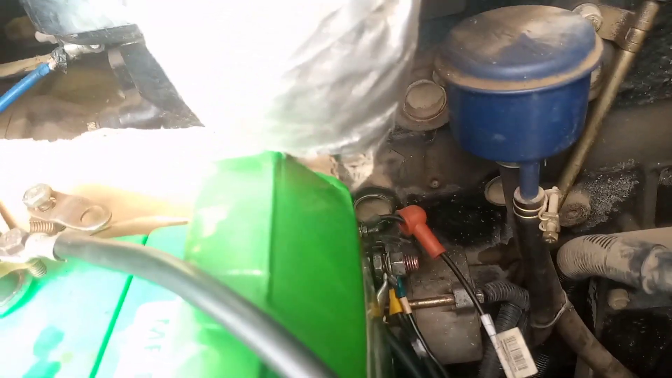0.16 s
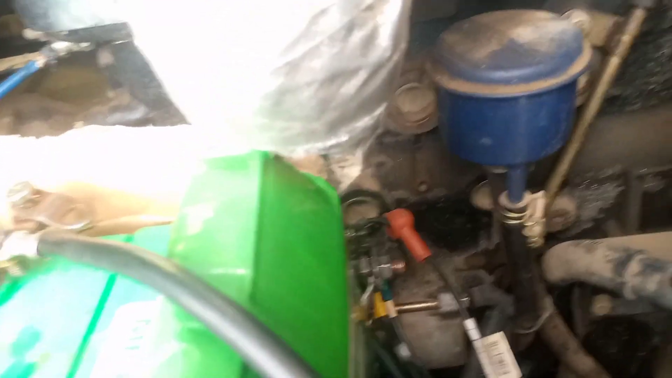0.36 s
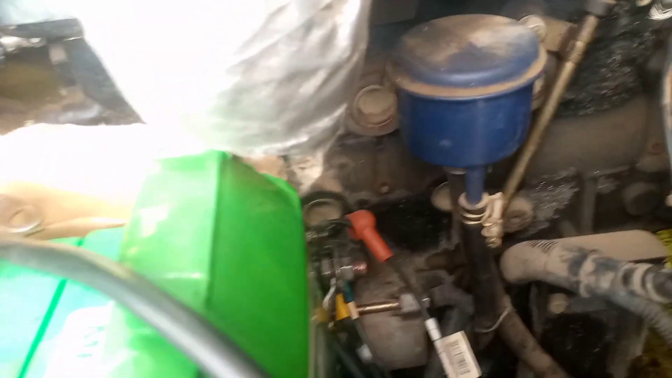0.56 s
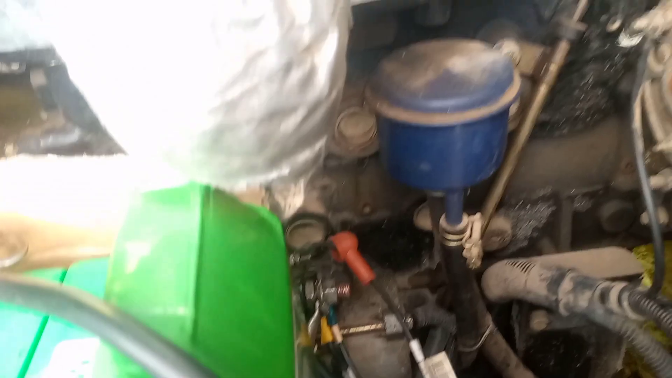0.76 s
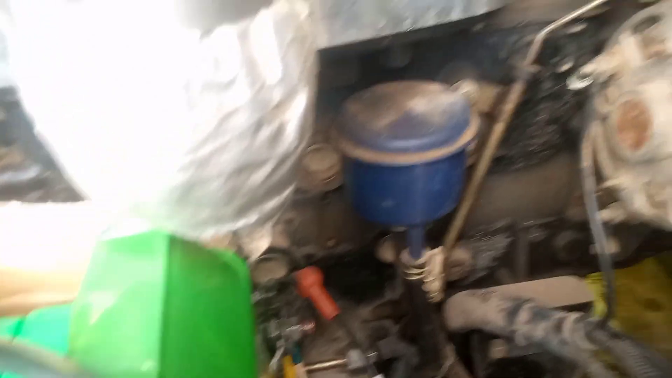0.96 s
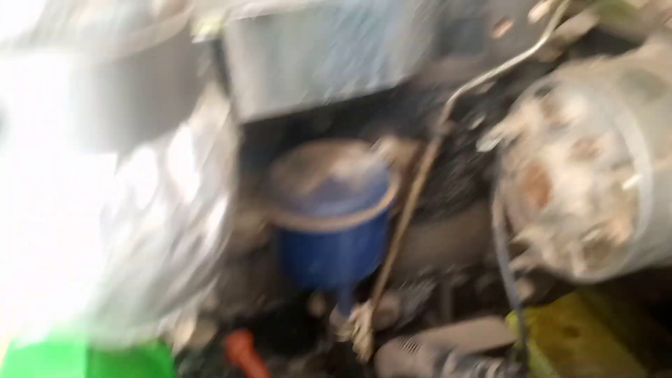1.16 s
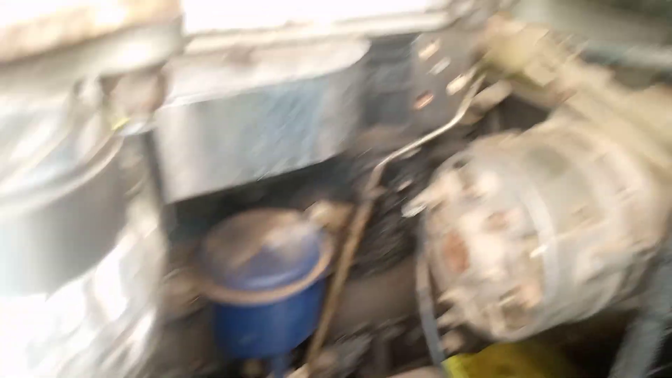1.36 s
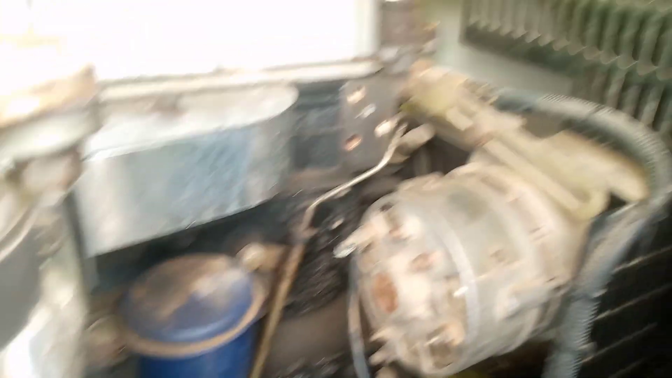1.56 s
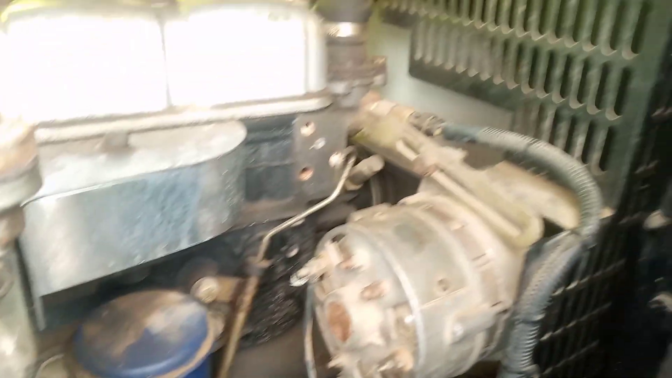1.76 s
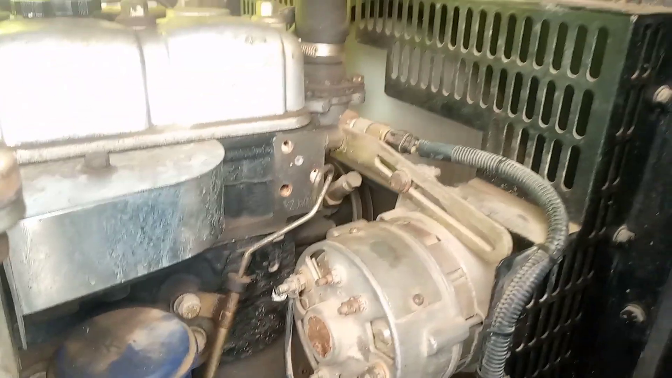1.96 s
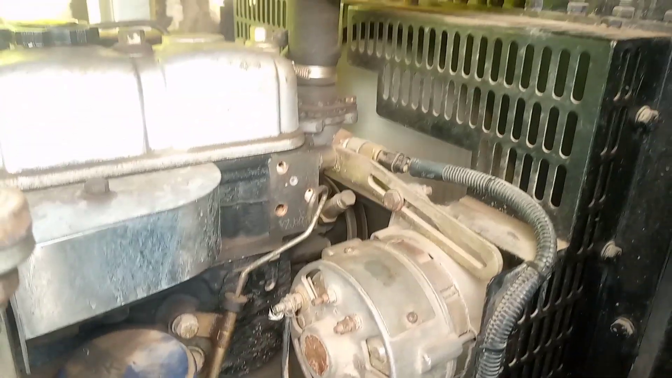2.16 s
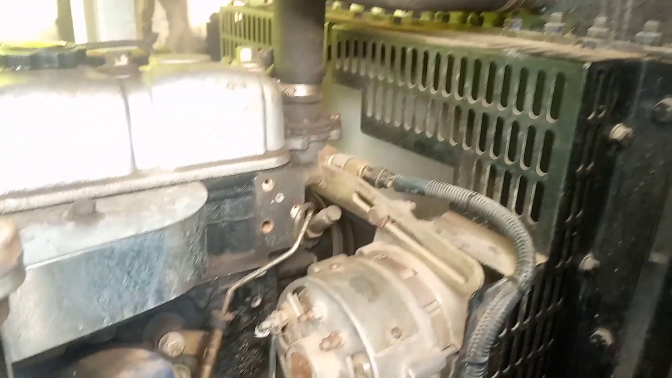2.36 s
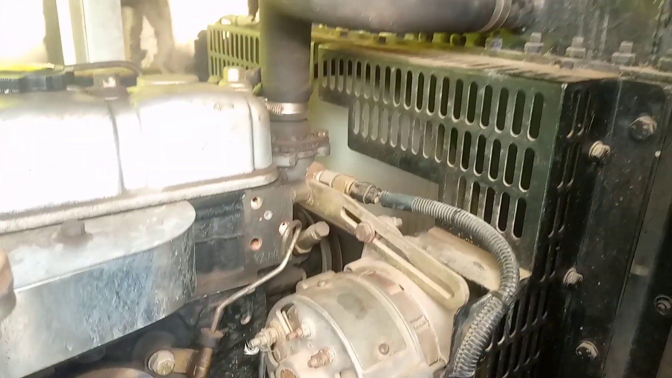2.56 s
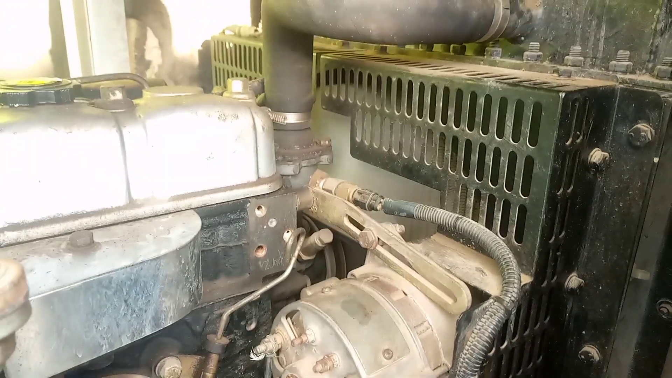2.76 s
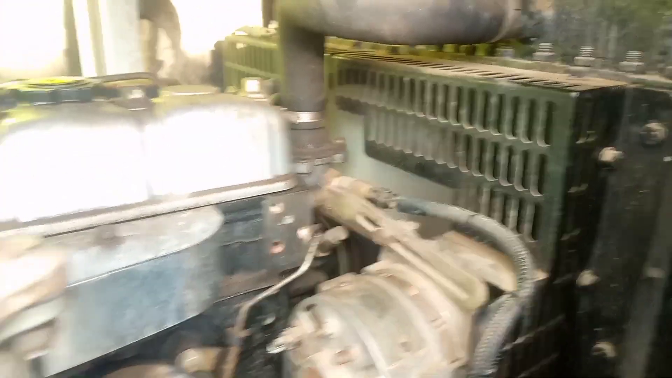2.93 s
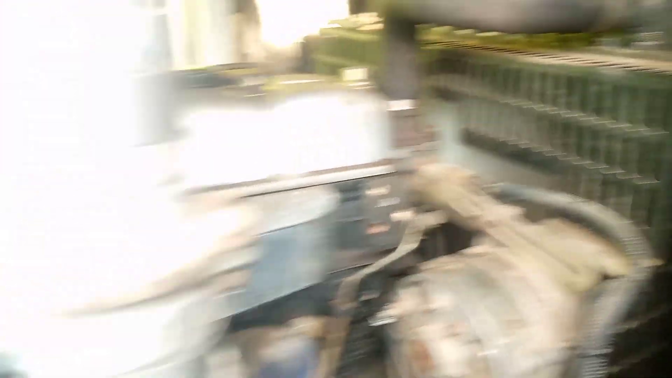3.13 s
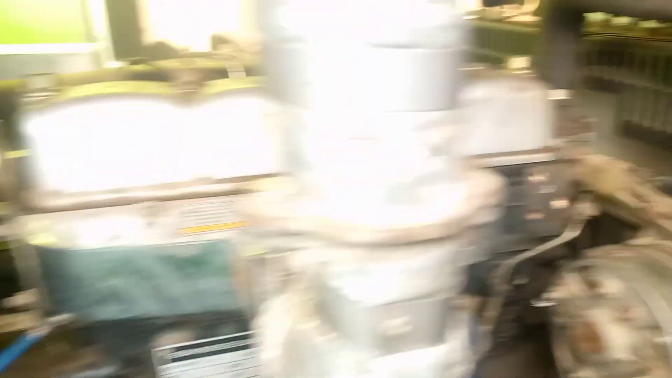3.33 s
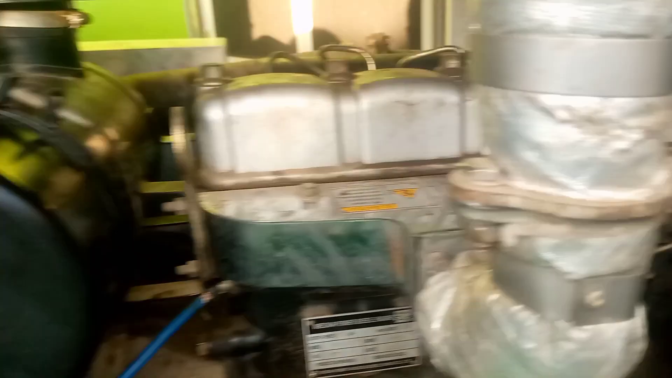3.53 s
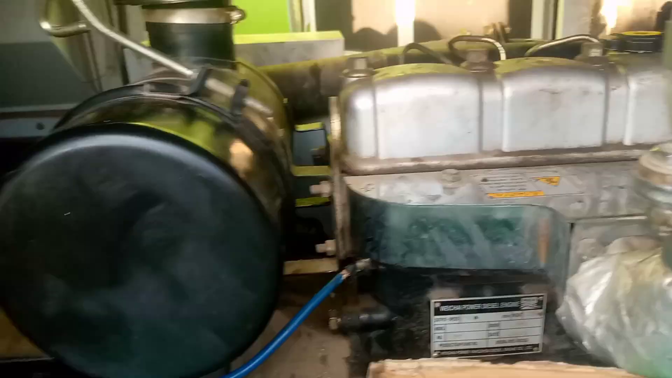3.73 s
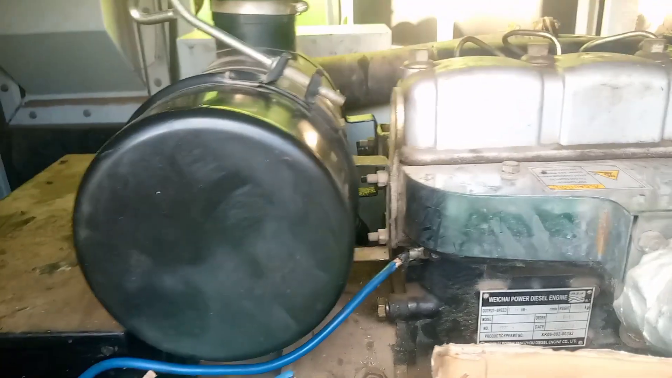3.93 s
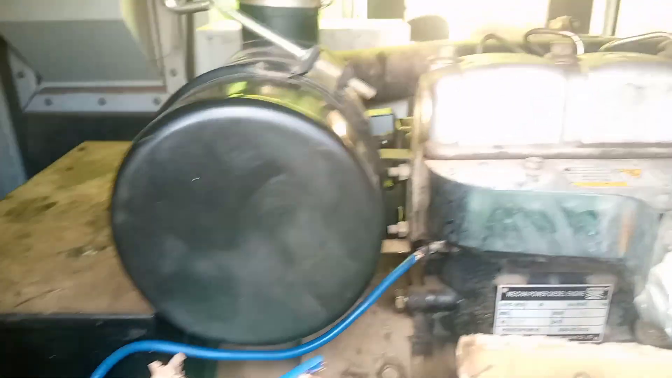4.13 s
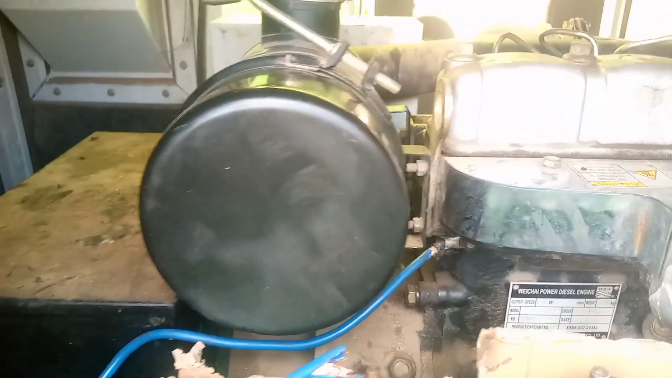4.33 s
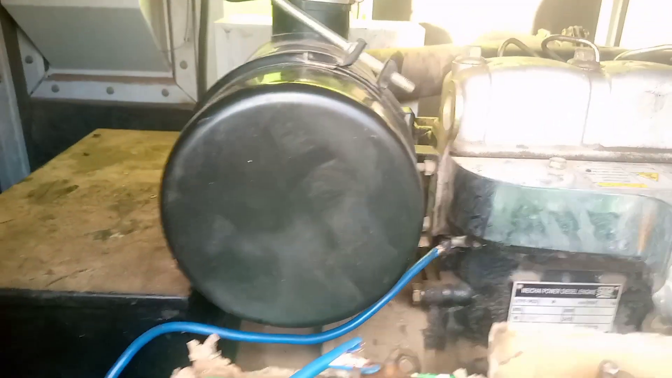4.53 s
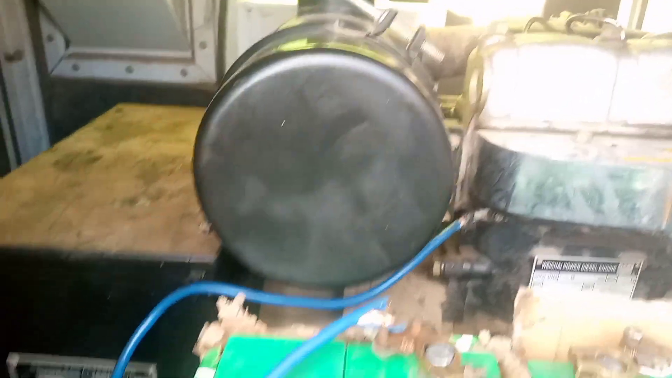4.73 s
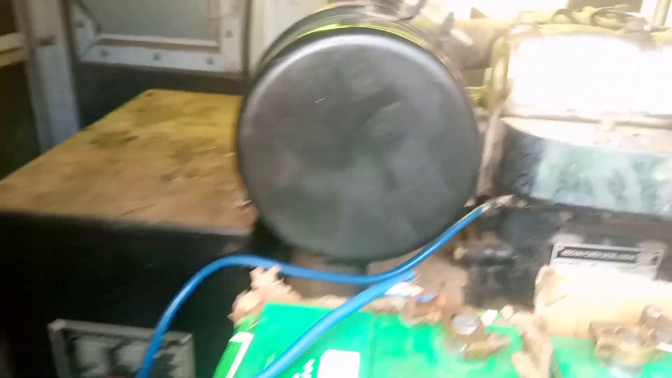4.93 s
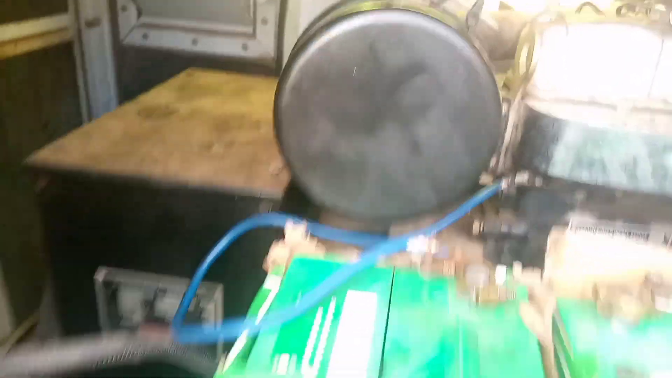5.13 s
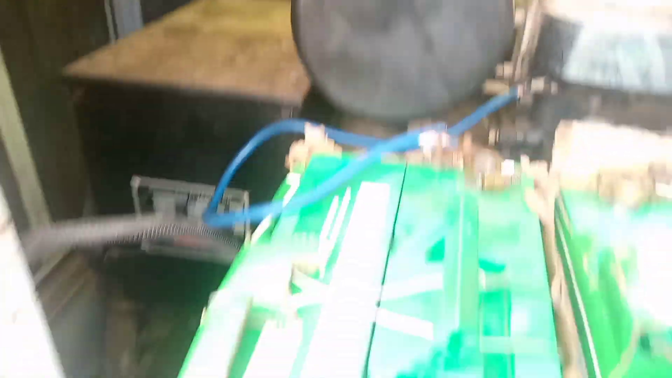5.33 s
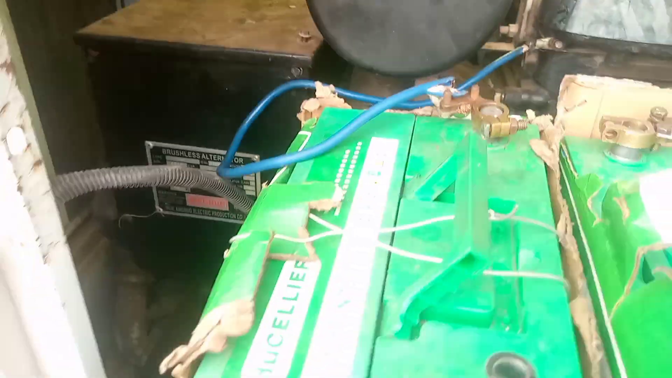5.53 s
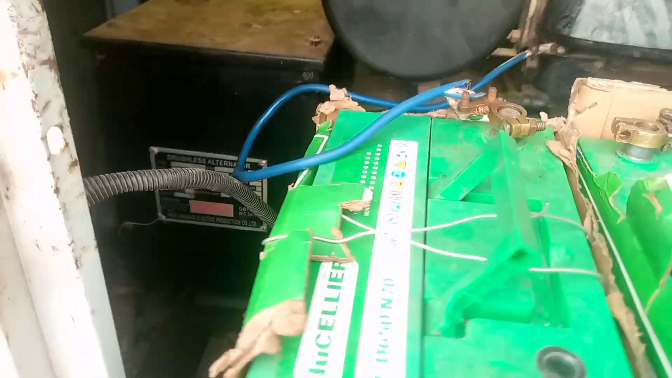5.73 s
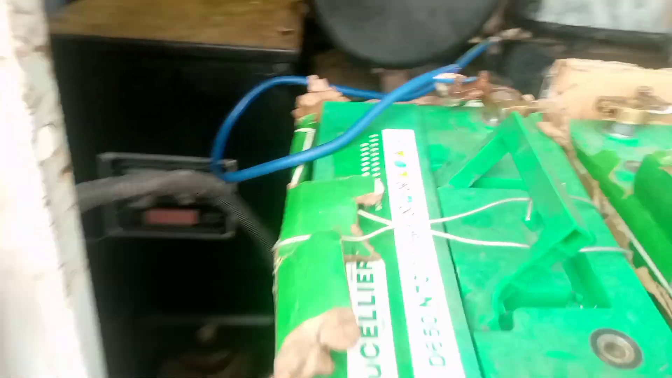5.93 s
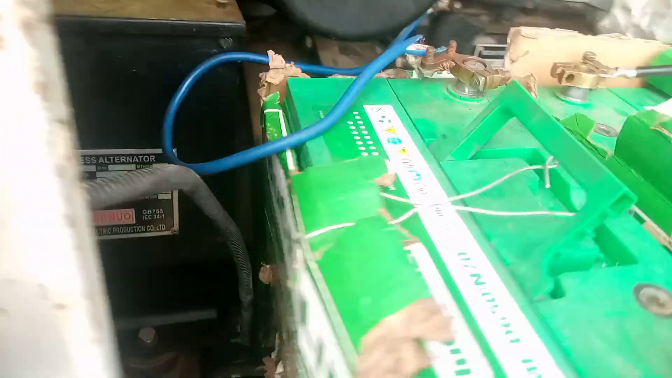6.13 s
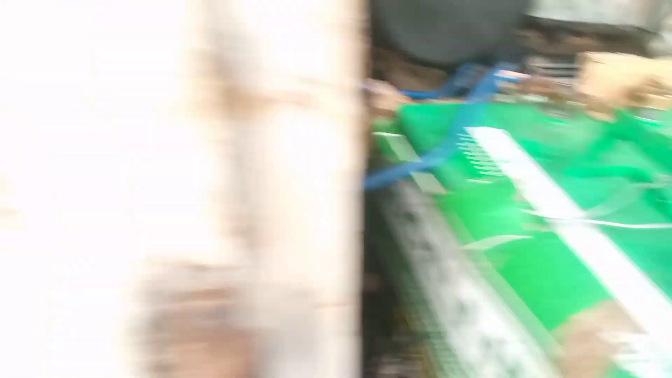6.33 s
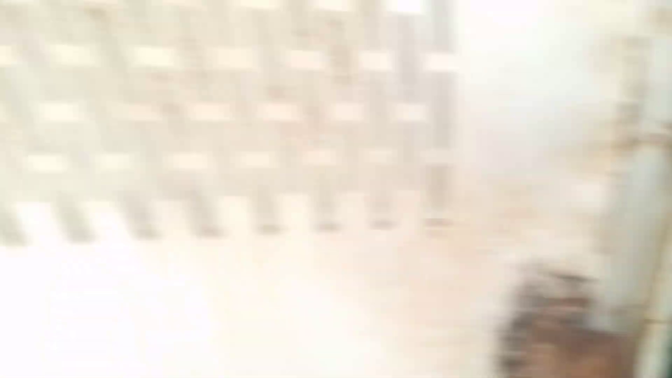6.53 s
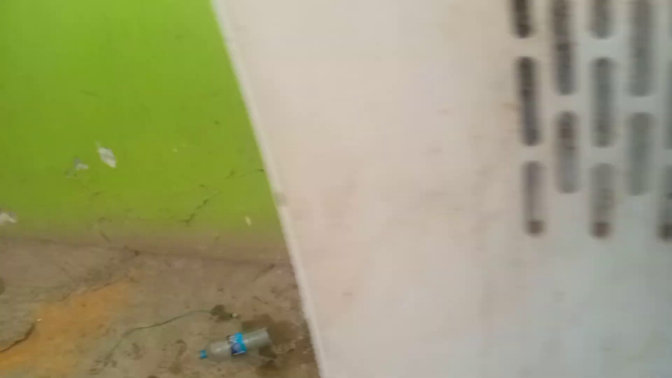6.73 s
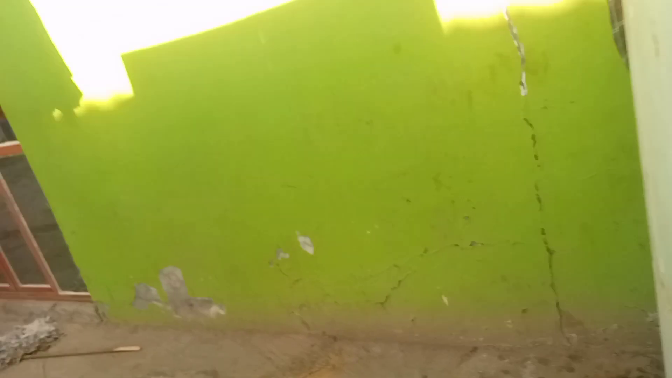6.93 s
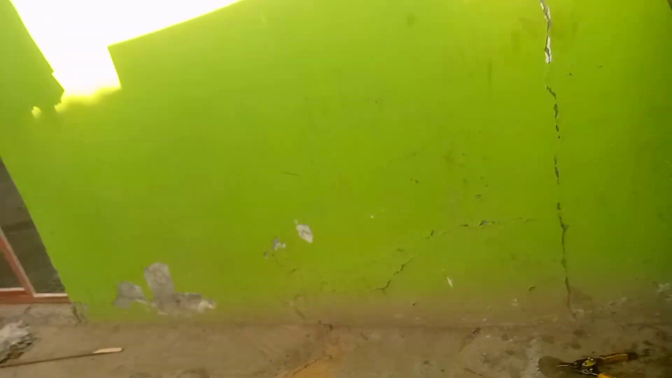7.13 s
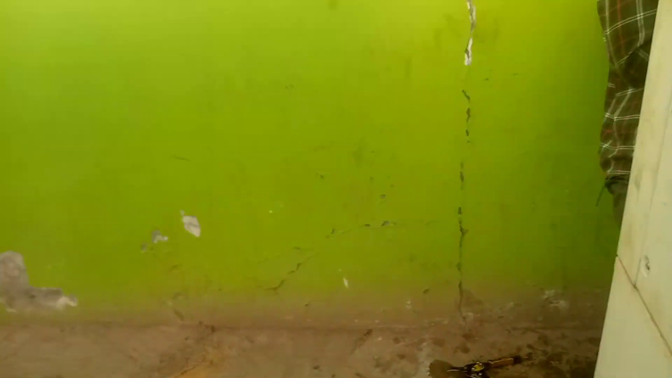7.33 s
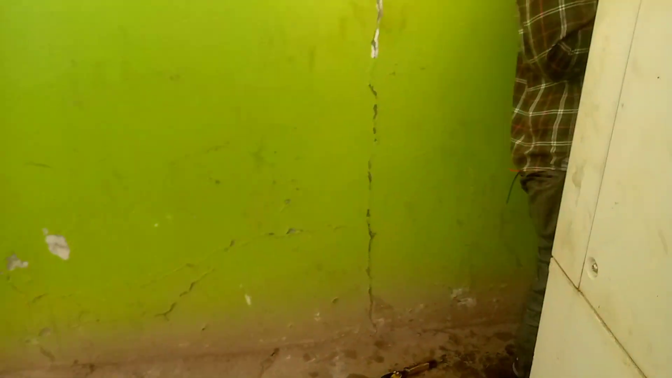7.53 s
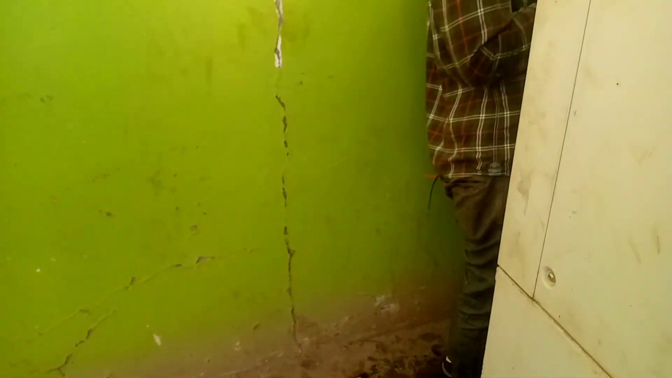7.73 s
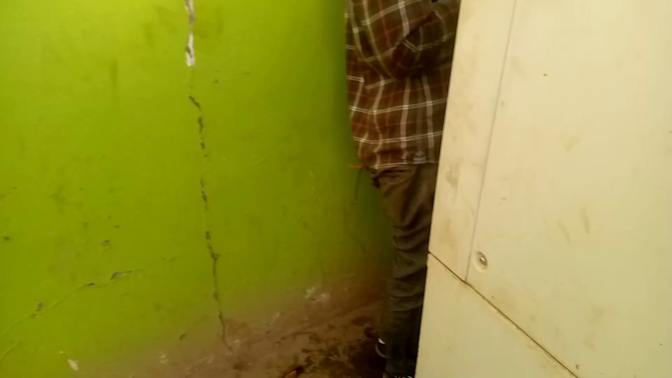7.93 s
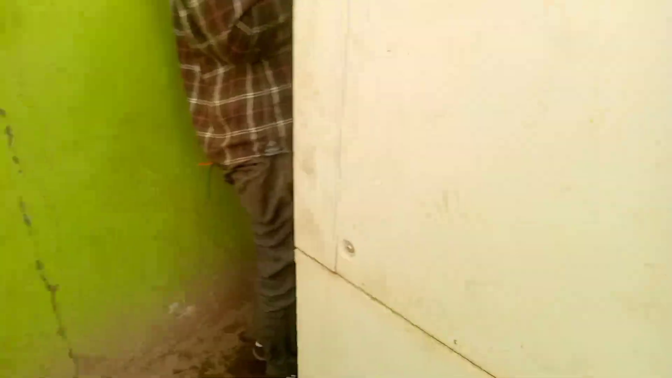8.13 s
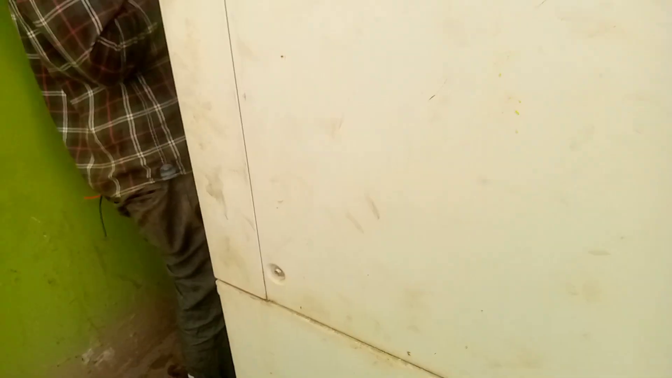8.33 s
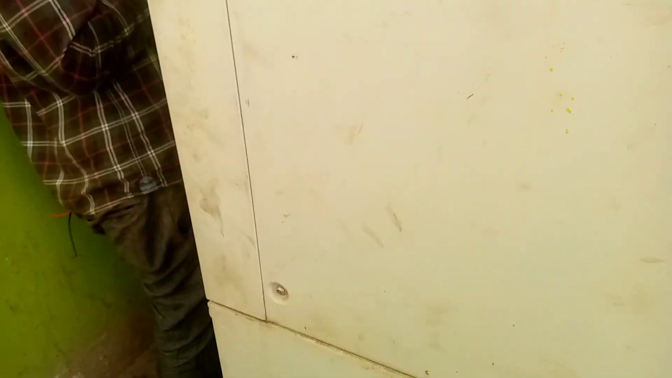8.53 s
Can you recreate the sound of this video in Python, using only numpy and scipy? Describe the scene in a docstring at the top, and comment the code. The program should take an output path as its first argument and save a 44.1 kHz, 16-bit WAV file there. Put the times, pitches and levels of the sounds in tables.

```python
"""Outdoors, close beside a four-cylinder diesel generator running at governed speed in a steel canopy.
Every firing gives an exhaust boom and a knock that rings the block; gears, valves and fan fill the gaps.
The microphone, on a hand-held camera, passes the alternator and the air cleaner, then backs away
behind the canopy, where the clatter turns dull. Fingers click on the camera body,
and the loudest click makes its limiter duck."""
import sys
import numpy as np
from scipy import signal
from scipy.fft import rfft, irfft, next_fast_len
from scipy.io import wavfile
from scipy.ndimage import uniform_filter1d, minimum_filter1d, map_coordinates

SR = 44100
rng = np.random.default_rng(int(sys.argv[2]) if len(sys.argv) > 2 else 0)


def master_out(mix):
    """Clip the mix to full scale and print it as 16-bit PCM to the path in sys.argv[1]."""
    frames = np.transpose(np.atleast_2d(mix))
    ceiling = np.clip(frames, -1, 1)
    pcm = np.round(ceiling * 32767).astype(np.int16)
    wavfile.write(sys.argv[1], SR, pcm)


N = 378378

# the cylinders in firing order: (relative knock [dB], relative injector tick [dB], lateness [s])
CYLINDERS = [(2, -9, 0.00017), (1.5, -6, 0.000056), (0.8, -10, 0), (2.47, -1, 0.0011)]
# load drags the firing rate down, the governor pulls it back: (time [s], half length [s], depth [Hz])
SPEED_SAGS = [(2.0, .45, .28), (7.6, .8, .09)]


def amp(db):
    """Decibels to gain."""
    return 10 ** (np.asarray(db) / 20)


def unit(x):
    """Scale to rms 1."""
    return x / np.sqrt(np.mean(x ** 2) + 1e-20)


def along(points, hz):
    """Read a curve of (frequency [Hz], value) points on a log axis."""
    freqs, values = np.transpose(points)
    return np.interp(np.log(hz + 1), np.log(freqs + 1), values)


def above(hz, edge_hz, order=8):
    """Gain of a high-pass."""
    return 1 / np.sqrt(1 + (edge_hz / (hz + 1)) ** (2 * order))


def wobble(rate):
    """A smooth random curve, rate knots a second."""
    return map_coordinates(rng.standard_normal(int(N * rate / SR) + 4), [np.arange(N) * rate / SR])


def swells(rows):
    """Sum of even rises and falls, one for each row of (time [s], half length [s], height)."""
    t = np.arange(N) / SR
    return sum(height * np.clip(1 - abs(t - centre) / half, 0, 1) for centre, half, height in rows)


def filtered(x, gain):
    """Apply a gain that depends on frequency."""
    size = next_fast_len(N + SR // 2)
    return irfft(rfft(x, size) * gain(np.fft.rfftfreq(size, 1 / SR)), size)[:N]


def resonate(x, gain, size=8192):
    """Apply a gain curve as a causal filter, so that its peaks ring after each blow."""
    cepstrum = irfft(np.log(gain(np.fft.rfftfreq(size, 1 / SR)) + 1e-6))
    cepstrum[1:size // 2] *= 2
    cepstrum[size // 2 + 1:] = 0
    return signal.oaconvolve(x, irfft(np.exp(rfft(cepstrum))))[:N]


def strike(times, bursts):
    """Lay one burst (row) at each time."""
    at = np.round(times * SR).astype(int)[:, None] + np.arange(bursts.shape[1])
    inside = (at >= 0) & (at < N)
    return np.bincount(at[inside], bursts[inside], N)


def firing_count(firing_hz=40.977, creep_hz_per_s=.0105):
    """Firings since the start: a governed rate that creeps down and sags now and then."""
    rate = firing_hz - creep_hz_per_s * np.arange(N) / SR - swells(SPEED_SAGS)
    return np.cumsum(rate) / SR - .028


def firing_times(firings, phase):
    """Number and time of every firing, taken at a phase (0-1) of its turn."""
    number = np.arange(int(firings[-1]) + 1)
    return number, np.interp(number + phase, firings, np.arange(N) / SR)


def microphone_walk():
    """Place number and levels at the microphone: held at each stop, gliding between stops."""
    # places 0-5 are oil filler, alternator, air cleaner, battery, door edge, behind the canopy:
    # (arrival [s], departure [s], boom [dB], clatter [dB], treble [dB], cover against clatter [dB])
    stops = [(0, .8, -22.8, -22.5, -32.5, -11), (1.25, 3.05, -24.6, -21.5, -37, -18.5),
             (3.75, 4.65, -23.5, -23.5, -38, -20), (5.15, 5.853, -24, -24.5, -37.5, -16.5),
             (6.3, 6.526, -24.5, -25, -38, -23), (7.24, 8.58, -32, -36.5, -56, -16.5)]
    stops = np.array(stops)
    times = np.sort(stops[:, :2].ravel())
    columns = [np.arange(len(stops)), *stops[:, 2:].T]
    return [np.interp(np.arange(N) / SR, times, np.repeat(column, 2)) for column in columns]


def handling():
    """Fingers click on the camera body, right at the microphone."""
    # finger clicks: (time [s], strength [dB])
    clicks = [(0.8674, 6.5), (2.9742, -12.5)]
    # modes of the camera body: (frequency [Hz], relative level [dB], t60 [s])
    case_modes = [(2110, -1, 0.0034), (4920, -1.5, 0.0021), (9500, -37, .002)]
    times, click_db = np.transpose(clicks)
    t = np.arange(SR // 50) / SR
    ring = sum(amp(db - 60 * t / t60) * np.sin(2 * np.pi * hz * t) for hz, db, t60 in case_modes)
    taps = strike(times, amp(click_db)[:, None] * ring)
    return filtered(taps, lambda hz: amp(along([(5500, 0.5), (8000, -13), (15000, -13.5)], hz)))


def panel_drone(firings):
    """The panels hum, a little unsteadily, on multiples of the whole engine cycle."""
    # panel tones: (multiple of the four-stroke cycle rate, relative level [dB])
    tones = [(6, -5.5), (10, -4), (17, -1), (20, -4), (24, -1), (25, 1), (27, -4), (36, -7.5), (64, -5.5)]
    cycles = firings / len(CYLINDERS)
    return sum(amp(db + 2.0 * wobble(6)) * np.sin(2 * np.pi * (k * cycles + rng.random()))
               for k, db in tones)


def cover_ring(firings, cover_hz=620, t60=0.047):
    """One cylinder's knock sets a nearby cover ringing, a hollow beat ten times a second."""
    number, times = firing_times(firings, phase=.62)
    times = times[number % len(CYLINDERS) == 1]
    t = np.arange(SR // 10) / SR
    strength_db, detune = rng.standard_normal((len(times), 2)).T[:, :, None]
    envelope = amp(strength_db - 60 * t / t60) * (1 - np.exp(-t / 0.0032))
    ring = envelope * np.sin(2 * np.pi * cover_hz * (1 + 0.028 * detune) * t)
    return unit(strike(times, ring))


def panel_echoes(x, echo_db=-18, delays_s=(.0023, .0037, .0059), sway_s=0.00033):
    """Nearby panels echo with delays that drift as the microphone moves, so the colour keeps shifting."""
    n = np.arange(N)
    echoes = sum(np.interp(n - SR * (delay + sway_s * wobble(0.786)), n, x) for delay in delays_s)
    return x + amp(echo_db) * echoes


def yard_wash(x, t60):
    """Reflections inside the canopy and off the yard wall smear the knocks into a wash."""
    t = np.arange(SR // 4) / SR
    energy = signal.oaconvolve(x ** 2, amp(-60 * t / t60) ** 2)[:N]
    return unit(np.sqrt(abs(energy)) * rng.standard_normal(N))


def exhaust(firings, place):
    """Every firing gives one low push and suction, over a soft rumble of gas flow."""
    # boom at the open door and behind the canopy: (multiple of the firing rate, relative level [dB])
    door_orders = [(1, -14), (2, -1), (3, -6.5), (4, -16.5), (5, -25.5)]
    behind_orders = [(1, -7), (2, -2), (3, -8.5), (4, -21), (5, -19.5)]
    # gas flow in the exhaust: (frequency [Hz], relative spectral level [dB])
    flow_spectrum = [(20, -20), (45, -9), (62, -1.5), (110, -0.5), (180, -2), (300, -28.5), (900, -88)]
    angle = 2 * np.pi * (firings - .125)
    pulse = lambda orders: unit(-sum(amp(db) * np.sin(k * angle) for k, db in orders))
    behind = np.clip(place - 4, 0, 1)
    boom = (1 - behind) * pulse(door_orders) + behind * pulse(behind_orders)
    flutter_db = .3 * wobble(27) + .55 * behind * wobble(7)
    rumble = unit(filtered(rng.standard_normal(N), lambda hz: amp(along(flow_spectrum, hz))))
    return boom * amp(flutter_db) + amp(-11.5) * rumble


def rattle(cylinder, size, repeat, grain_db):
    """Grainy noise for each firing: the share `repeat` is the cylinder's own pattern, the rest is new."""
    def grains(rows):
        noise = rng.standard_normal((rows, size))
        return unit(noise * amp(grain_db * rng.standard_normal((rows, size))))
    pattern = grains(len(CYLINDERS))[cylinder]
    return np.sqrt(repeat) * pattern + np.sqrt(1 - repeat) * grains(len(cylinder))


def gear_whirr(times, cylinder):
    """Gears, valves and fan never stop: overlapping bursts that partly repeat with each engine cycle."""
    # colour of the whirr: (frequency [Hz], gain [dB])
    colour = [(150, -4), (350, 1), (800, 1), (1700, -2.5), (3000, -2), (6000, -6), (12000, -6)]
    window = np.sqrt(np.hanning(SR // 25))
    mesh = unit(strike(times - .02, window * rattle(cylinder, len(window), repeat=0.37, grain_db=3.5)))
    return filtered(mesh, lambda hz: amp(along(colour, hz)))


def combustion_knock(times, cylinder):
    """Cylinder pressure rises within a few ms and the shudder dies away; the injector adds a tick."""
    knock_db, tick_db, _ = np.transpose(CYLINDERS)[:, cylinder]
    t = np.arange(SR // 25) / SR
    shudder = (1 - np.exp(-t / 0.0015)) ** 2 * np.exp(-t / 0.0068)
    force = amp(knock_db + 0.73 * rng.standard_normal(len(times)))[:, None]
    knock = unit(strike(times, force * shudder * rattle(cylinder, len(t), repeat=0.56, grain_db=2.5)))
    snap = amp(tick_db + 2.0 * rng.standard_normal(len(times)))[:, None] * np.exp(-t / 0.00091)
    ticks = unit(strike(times + .001, snap * rattle(cylinder, len(t), repeat=0.34, grain_db=-1.0)))
    return knock + amp(-10) * filtered(ticks, lambda hz: above(hz, 4700, order=2))


def blows(firings, place):
    """Knock and whirr with their reflections; each cylinder keeps its own slightly uneven timing."""
    number, times = firing_times(firings, phase=.465)
    cylinder = number % len(CYLINDERS)
    lateness = np.array(CYLINDERS)[cylinder, 2]
    times = times + lateness + 4e-5 * rng.standard_normal(len(number))
    knock = combustion_knock(times, cylinder)
    whirr = gear_whirr(times, cylinder)
    # behind the canopy, much of the knock arrives only by reflection
    wet = np.clip(0.57 * (place - 4), 0, 1)
    return panel_echoes(np.sqrt(1 - wet) * knock + np.sqrt(wet) * yard_wash(knock, t60=0.084) + whirr)


def block_clatter(firings, place, clatter_db, treble_db):
    """The block radiates the blows with its own colour to each place; the canopy shades the treble most."""
    # colour of the clatter on each side of the engine: (frequency [Hz], relative gain [dB])
    alternator_side = [(100, -30.5), (170, -4), (220, -7.5), (258, -3.5), (417, -23), (459, -11.5),
                       (642, -9), (1120, -9.5), (1630, -1), (1790, -10), (1970, -2.5), (2130, -10),
                       (2990, -7), (5070, -23), (7810, -48), (10200, -75), (17200, -120)]
    cleaner_side = [(100, -27.5), (170, -1.5), (223, -13), (258, -5.5), (385, -12), (653, -8.5),
                    (1140, -6.5), (1480, -4), (1820, -10), (2000, -5.5), (2350, -9.5), (2940, -8.5),
                    (4600, -17), (6550, -28.5), (7810, -49), (10200, -64), (17200, -120)]
    behind_canopy = [(100, -41.5), (170, -9.5), (254, -1.5), (298, -14.5), (391, -17), (437, -4),
                     (481, -15), (674, -13), (1260, -20), (1570, -13.5), (4120, -29.5), (7810, -65.5),
                     (10200, -101), (17200, -120)]
    # ringing of block and covers: (frequency [Hz], width [Hz], lift at each of the six places [dB])
    modes = [(430, 45, 6.5, 4, 0, 4.5, 2, -5.5), (590, 110, 0, 2.5, -2.5, -0.5, 2, -0.5),
             (663, 53, 8, 2.5, 6.5, 6.5, 2.5, 8), (777, 32, 2.5, 2.5, 3, 3.5, 2, 3),
             (936, 41, 3.5, 5.5, -4, 6, 4.5, 2), (1173, 50, 1, 3, 1, 1, 1, 0.5),
             (1340, 150, 2, 3.5, -0.5, 0, -5, 4), (1510, 66, -3.5, 3, 1, 3.5, 6, 4),
             (1606, 77, 1.5, 1.5, 6.5, 0.5, 11, 4.5), (1662, 63, 6, 8.5, 5, 6, 2.5, 0.5),
             (1702, 65, 1.5, -1, -4.5, 6.5, 4.5, -3), (1840, 110, 1.5, 0, -4, -2, 3.5, -4),
             (1955, 76, 3.5, 2, -7, 6.5, 1.5, 6), (1983, 78, -1, 10, 13.5, 3, 0.5, -0.5),
             (2217, 46, 2, 8, 8.5, 4.5, 5, -7.5), (2324, 86, 3.5, 6, 0.5, -0.5, -5, 2),
             (2637, 54, -7, 4, 3, -7, -2, -3), (2955, 170, -4, 2.5, 1.5, 2, -1, 3.5),
             (3184, 160, -3, 0, 3.5, -1.5, 0.5, 4.5), (4180, 83, 3.5, 3, 2, -3, 1, -11),
             (4480, 61, 4, -4, 5, 7, 7, 6), (4980, 200, 4.5, 3.5, 1.5, 3, 5.5, 9),
             (5610, 210, 5, 3.5, -1.5, -5, 1, 4.5), (5950, 400, 3.5, 0.5, -0.5, 3.5, 3, 11)]
    force = blows(firings, place)
    body, treble = np.zeros(N), np.zeros(N)
    for stop, colour in enumerate([alternator_side] * 2 + [cleaner_side] * 3 + [behind_canopy]):
        ring_db = lambda hz: sum(lift[stop] / (1 + (2 * (hz - mode_hz) / width) ** 2)
                                 for mode_hz, width, *lift in modes)
        heard = resonate(force, lambda hz: amp(along(colour, hz) + ring_db(hz)))
        high = filtered(heard, lambda hz: above(hz, 3555) ** 2)
        nearness = np.clip(1 - abs(place - stop), 0, 1)
        body += nearness * unit(heard - high)
        treble += nearness * unit(high)
    # a faint recorder hiss near 15 kHz pulses with the knocks: (frequency [Hz], relative gain [dB])
    hiss_colour = [(13500, -10), (15200, 0.0), (16000, -2.5), (17000, -34.5)]
    recorder_hiss = unit(filtered(force, lambda hz: above(hz, 7700) * amp(along(hiss_colour, hz))))
    return amp(clatter_db) * body + amp(treble_db) * (treble + amp(-40.5) * recorder_hiss)


def passing(x, bright_above_hz=2840, spill_below_hz=870):
    """The clatter brightens as the microphone swings round; lows spill from the louvres it passes."""
    # swings, and the pass by the canopy's louvres: (time [s], half length [s], lift [dB])
    swings = [(3.35, 0.39, 2), (5.03, 0.38, 4), (8.45, 0.57, 3)]
    louvres = [(7.03, 0.43, 4)]
    upper = filtered(x, lambda hz: above(hz, bright_above_hz))
    lower = filtered(x, lambda hz: 1 - above(hz, spill_below_hz, order=4))
    return x + (amp(swells(swings)) - 1) * upper + (amp(swells(louvres)) - 1) * lower


def scene(drone_db=-18.5, load_db_per_hz=5.5):
    """The generator in mono, from close by the engine round to the back of the canopy."""
    firings = firing_count()
    place, boom_db, clatter_db, treble_db, cover_db = microphone_walk()
    cover = amp(cover_db) * cover_ring(firings)
    panels = amp(clatter_db) * (cover + amp(drone_db) * panel_drone(firings))
    block = block_clatter(firings, place, clatter_db, treble_db)
    # the load that drags the speed down also makes the exhaust louder
    boom = amp(boom_db + load_db_per_hz * swells(SPEED_SAGS)) * exhaust(firings, place)
    return (boom + passing(block + panels) + handling())[None]


def limiter(x, ceiling_db, release_s):
    """The gain drops just ahead of a peak and creeps back."""
    decay = np.arange(N) / SR / release_s
    excess_db = np.maximum(20 * np.log10(abs(x) + 1e-9) - ceiling_db, 1e-9)
    held_db = np.exp(np.maximum.accumulate(np.log(excess_db) + decay) - decay)
    gain_db = uniform_filter1d(minimum_filter1d(-held_db, size=600), size=300)
    return x * amp(gain_db)


def record(dry):
    """The camera limits the microphone's peaks and keeps nothing above its band limit."""
    limited = limiter(dry[0], ceiling_db=-3.5, release_s=0.022)
    return filtered(limited, lambda hz: hz < 15830)[None]


dry = scene()
out = record(dry)
master_out(out)
```